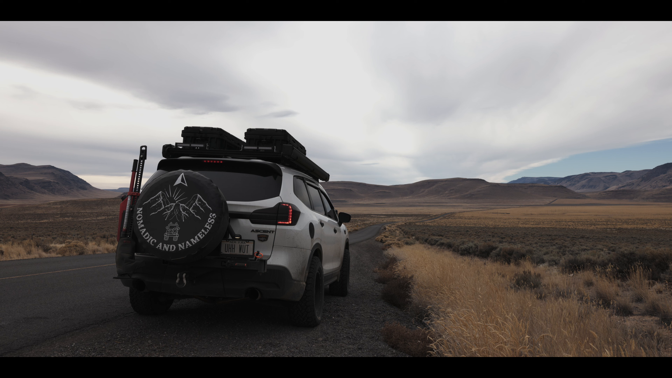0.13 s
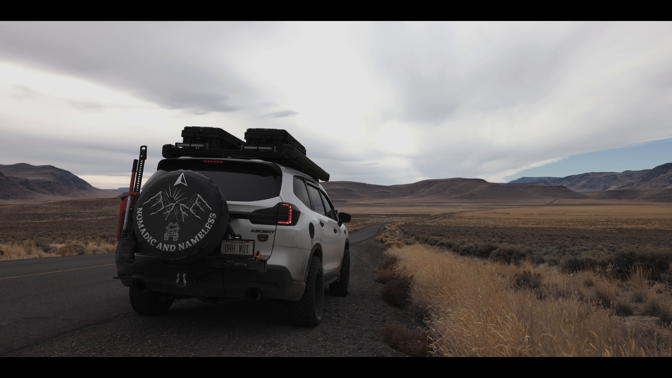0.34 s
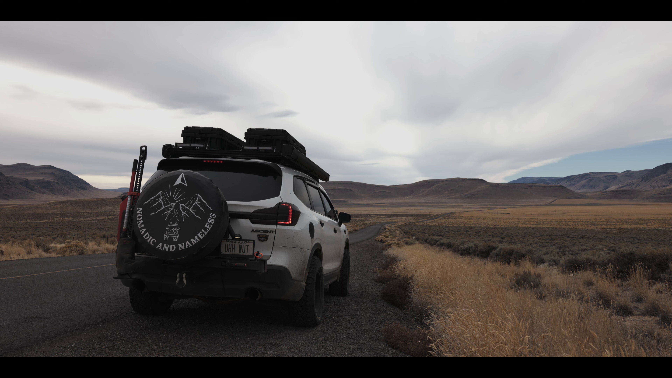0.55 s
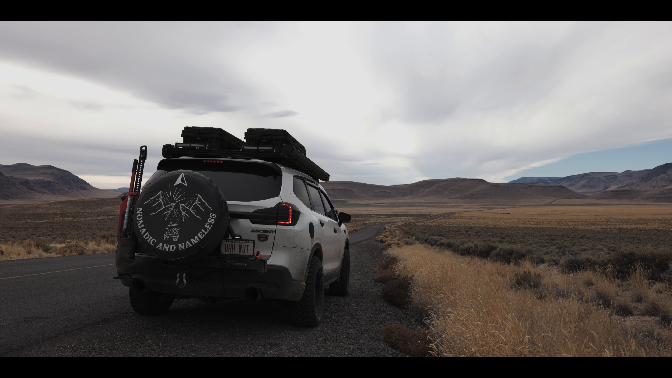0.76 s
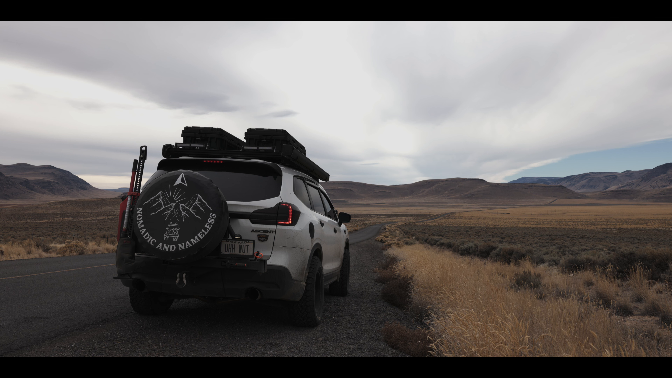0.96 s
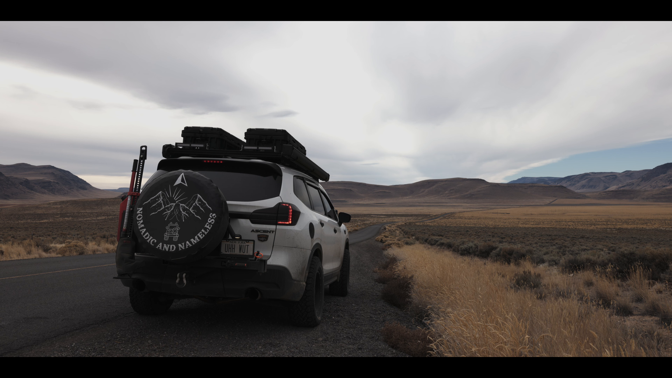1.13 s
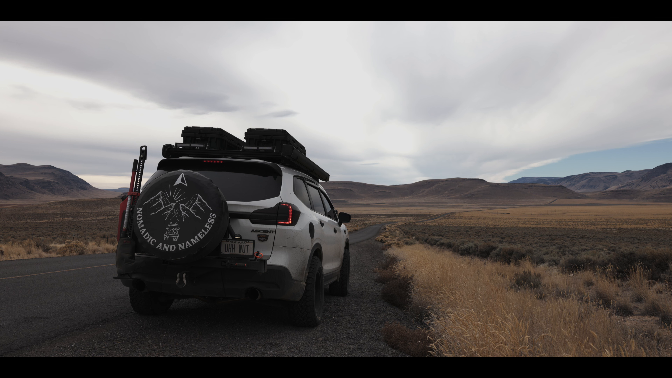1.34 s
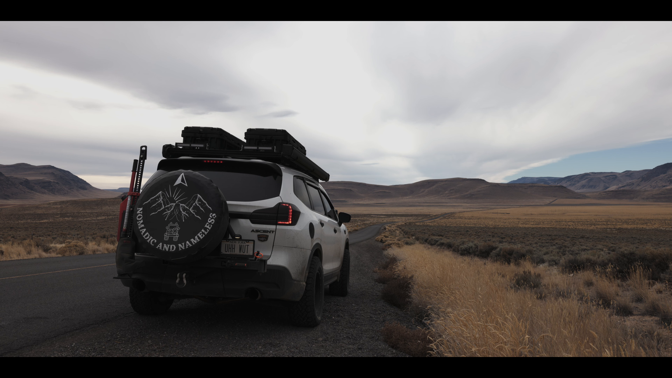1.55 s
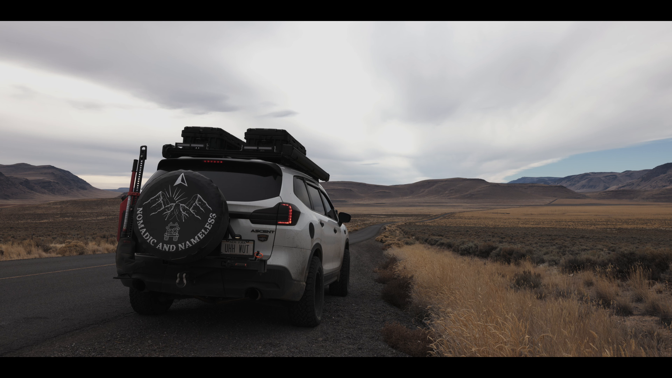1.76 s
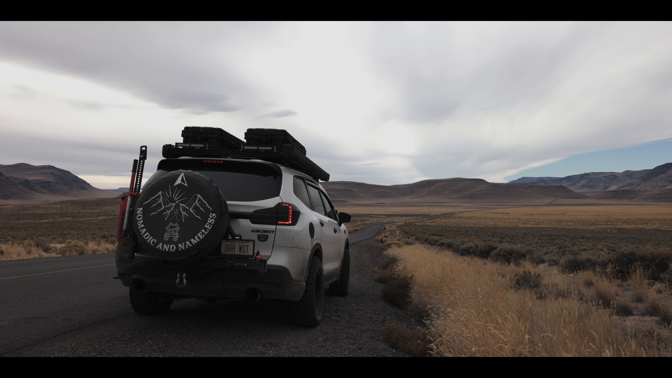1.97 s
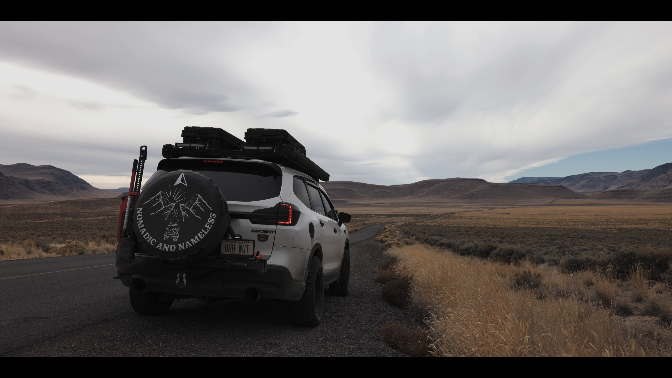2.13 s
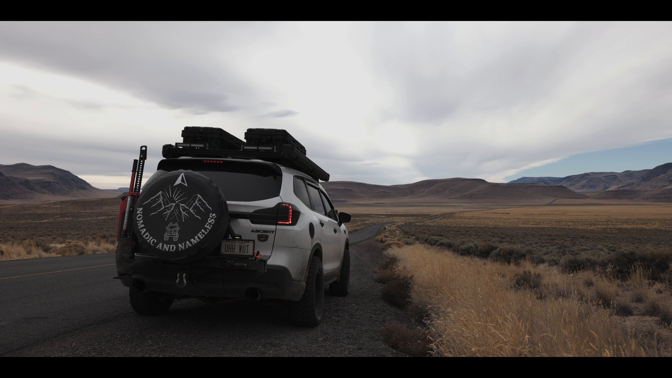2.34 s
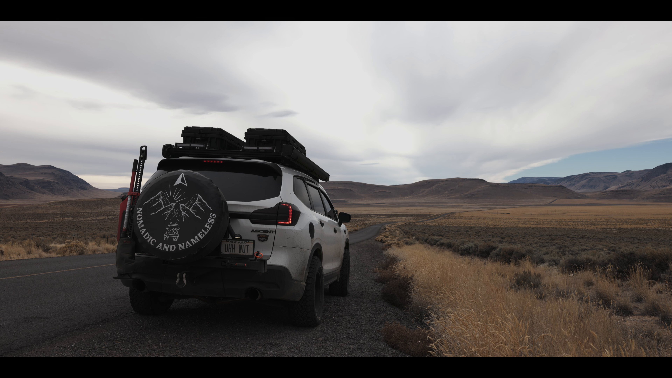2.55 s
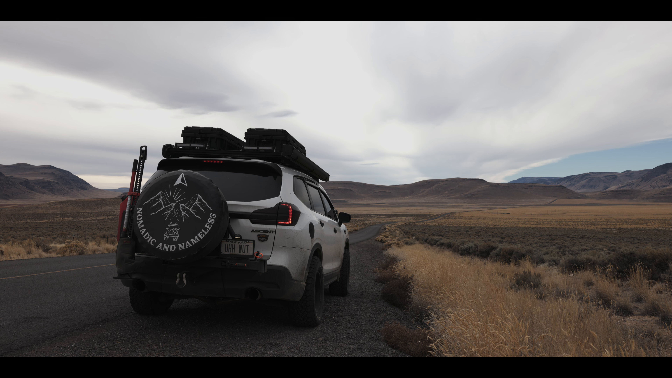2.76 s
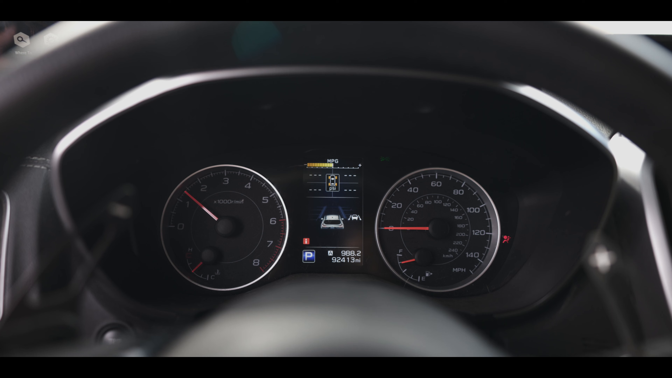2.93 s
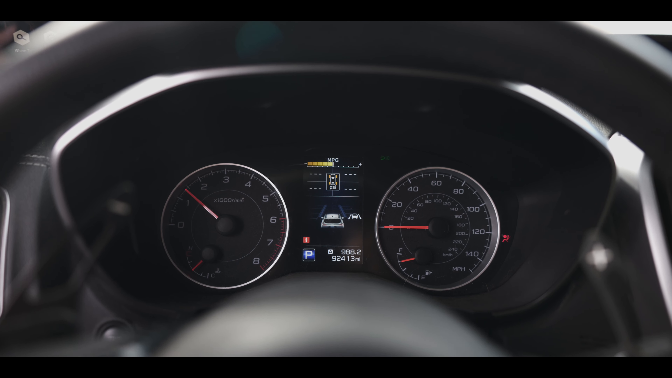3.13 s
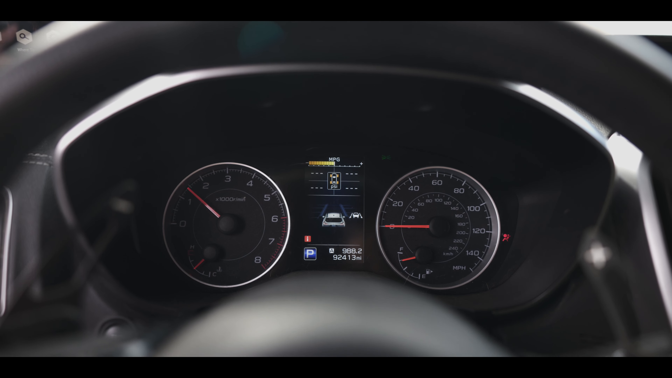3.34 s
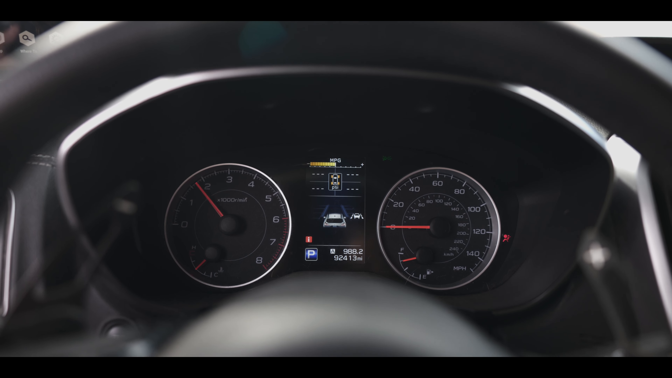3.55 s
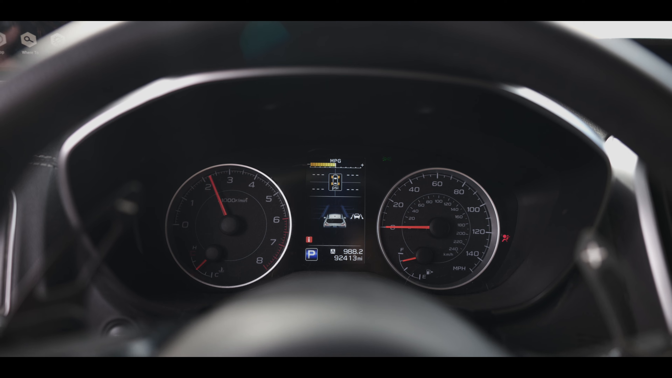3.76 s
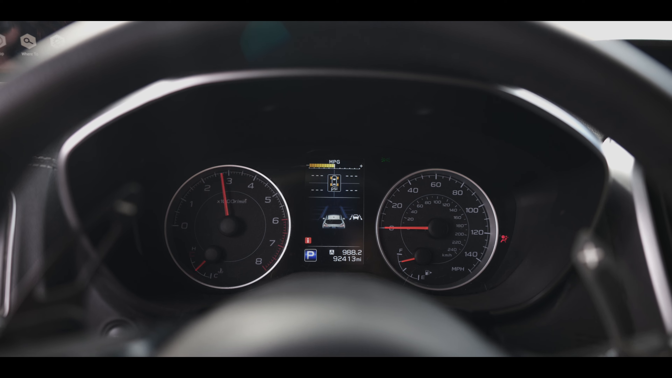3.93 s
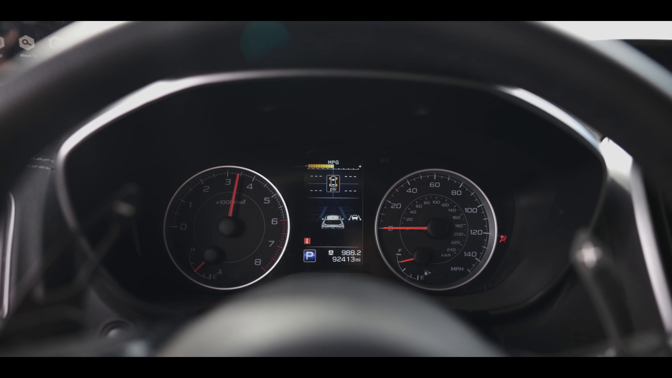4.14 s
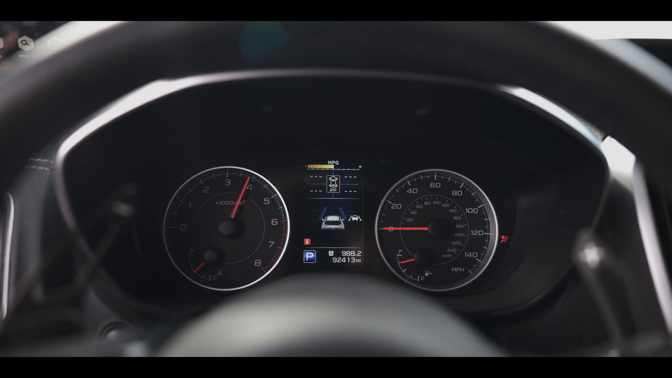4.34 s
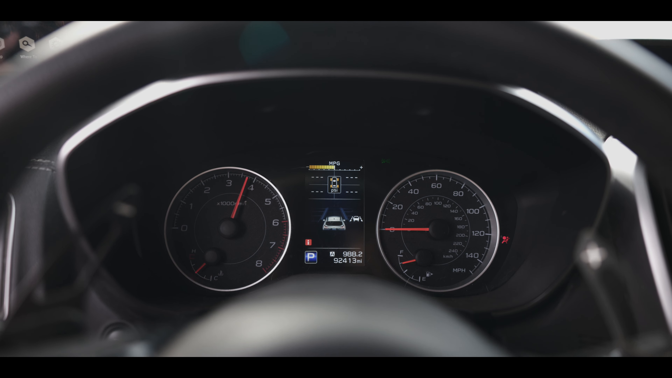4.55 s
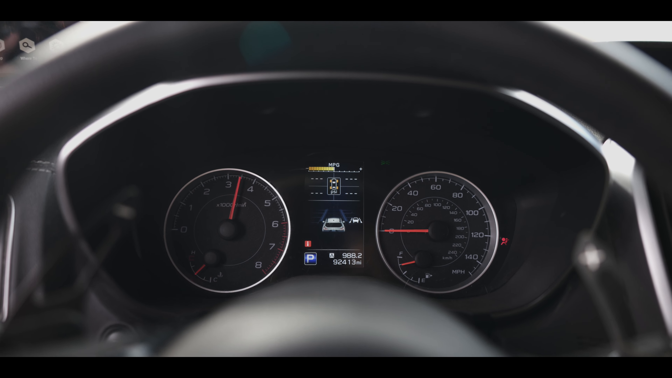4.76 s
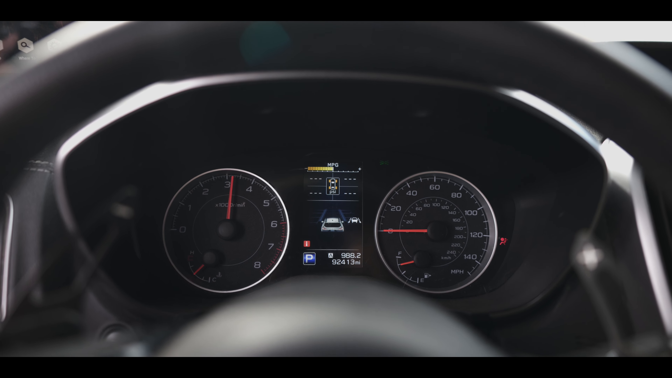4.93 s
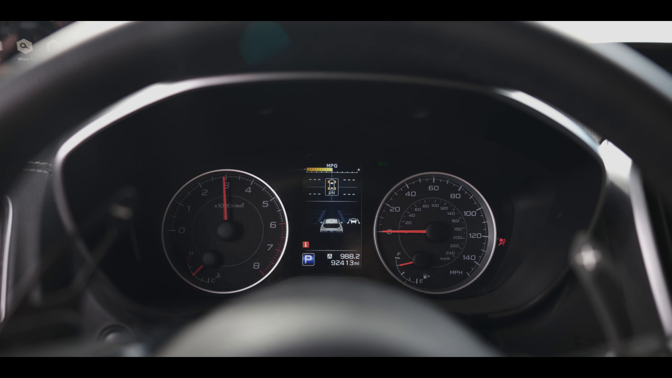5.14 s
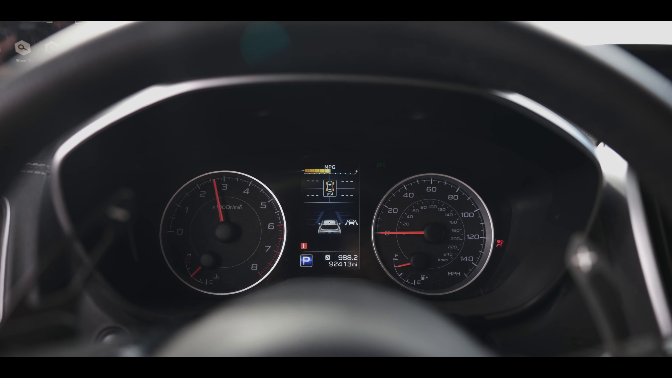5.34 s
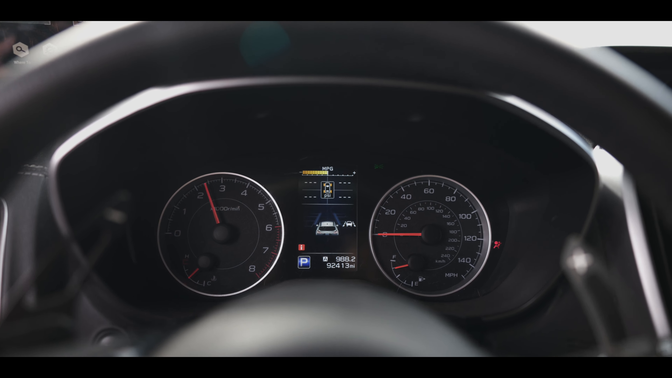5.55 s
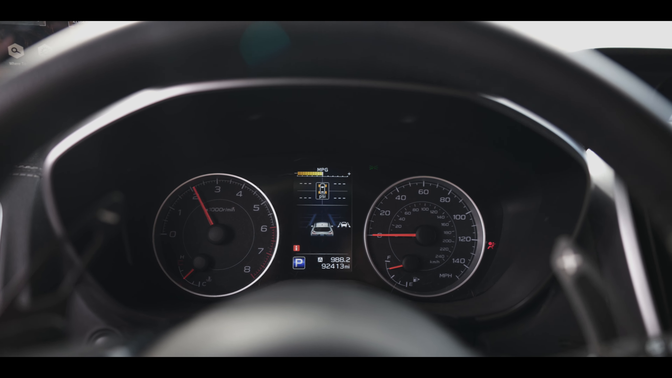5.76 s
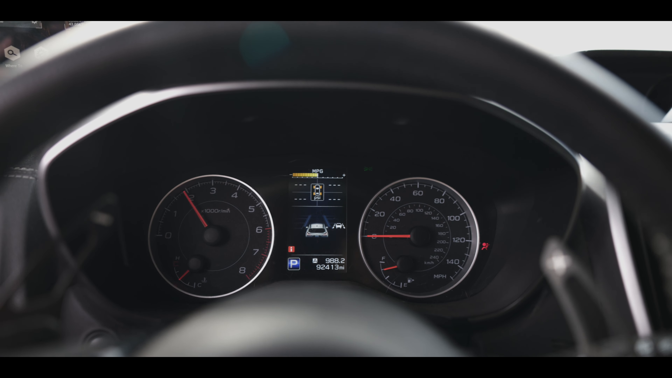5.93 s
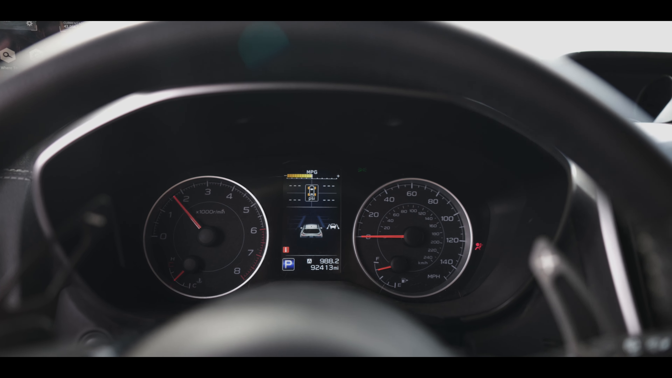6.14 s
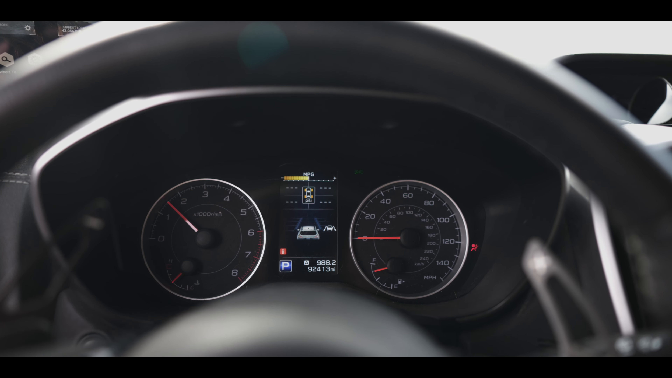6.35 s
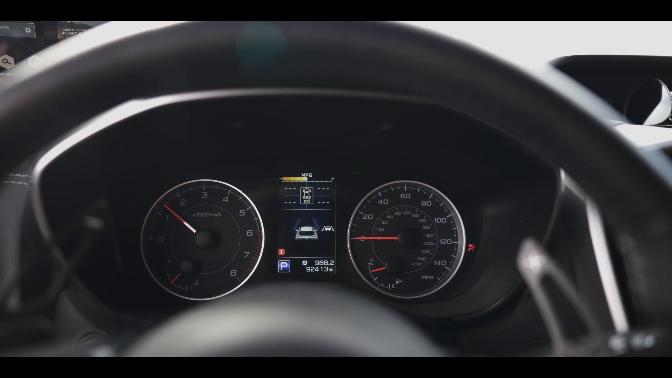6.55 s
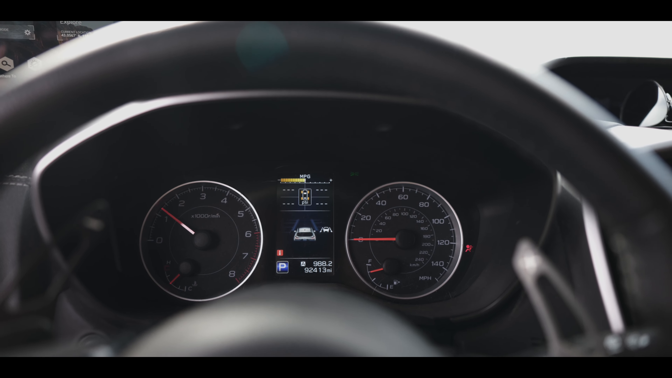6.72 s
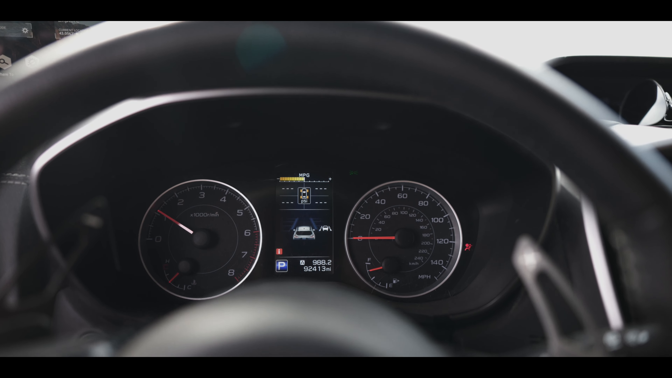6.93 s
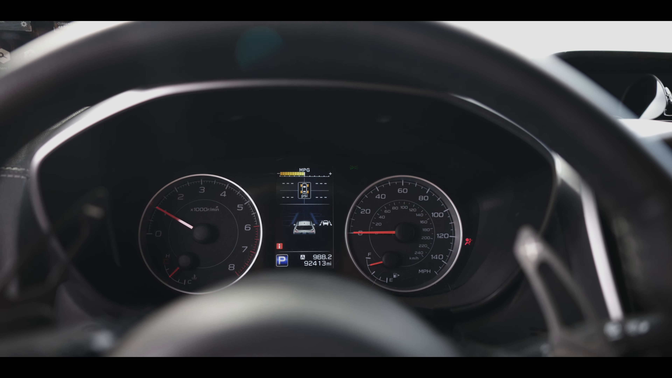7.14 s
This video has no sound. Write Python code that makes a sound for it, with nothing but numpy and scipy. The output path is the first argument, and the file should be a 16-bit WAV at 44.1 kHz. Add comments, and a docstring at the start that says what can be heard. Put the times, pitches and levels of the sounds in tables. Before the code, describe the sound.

A parked car's engine putters at idle with small exhaust pops, then revs once and sinks back with a backfire.

```python
"""Close to the tailpipe of a parked car, a turbocharged four-cylinder putters at idle: each firing
thumps through the pipe and puffs out gas, and now and then one pops. After a jump to another spot
the engine is revved once: its pulses sweep the pipe's resonances, booming, then rasping near the top.
A softer bang marks the peak, and the revs sink with one backfire. A few small clacks and the
stepping of a lens motor sound close by, over still air."""
import sys
import numpy as np
from scipy import signal
from scipy.io import wavfile
from scipy.ndimage import uniform_filter1d, map_coordinates

SR = 44100
rng = np.random.default_rng(int(sys.argv[2]) if len(sys.argv) > 2 else 0)


def transcribe(u):
    """Save the signal u as a 16-bit wav file named by the first command-line argument.

    u: samples, shape (n,) or (channels, n), limited to [-1, 1]; the rate is SR.
    q: integer samples, one column per channel.
    """
    v = np.clip(np.atleast_2d(u).T, -1, 1)
    q = np.round(v * 32767).astype(np.int16)
    wavfile.write(sys.argv[1], SR, q)


N = 321489
T = np.arange(N) / SR
CRUISE_RATE = 100  # firings per second

# the pipe's main resonance (frequency [Hz], level [dB])
PIPE_BOOM = [(40, -27), (90, -14.5), (135, -18.5), (158, -7.5), (172, -1), (186, -6), (205, -21.5),
             (230, -29.5), (300, -41), (600, -64)]
# the dull body of a bang or a knock (frequency [Hz], level [dB])
DULL_BODY = [(200, -4.5), (350, 2), (560, 2.5), (680, -5), (820, -3), (1050, -11.5), (1400, -16.5),
             (2000, -26), (4000, -52)]


def amp(db):
    """Decibels to gain."""
    return 10 ** (np.asarray(db) / 20)


def unit(x):
    """Scales to an rms of one."""
    return x / np.sqrt(np.mean(x ** 2) + 1e-20)


def steady(x, size=3500):
    """Scales to a running rms of one."""
    return x / np.sqrt(abs(uniform_filter1d(uniform_filter1d(x ** 2, size), size // 2)) + 1e-16)


def curves(rows):
    """Each column of a table as a curve in time."""
    s, *columns = np.transpose(rows)
    return [np.interp(T, s, c) for c in columns]


def response(points, hz):
    """Gain of a spectrum at the given frequencies."""
    f, db = np.transpose(points)
    return amp(np.interp(np.log(hz), np.log(f), db))


def colour(x, points, size=8192):
    """Rings x through a causal filter with the given spectrum."""
    hz, db = np.transpose(points)
    f = abs(np.fft.fftfreq(size, 1 / SR)) + 1
    octaves_out = np.maximum(np.log2(f / hz[-1]), 0) + np.maximum(np.log2(hz[0] / f), 0)
    gain = np.maximum(amp(np.interp(np.log(f), np.log(hz), db) - 18 * octaves_out), 1e-5)
    taps = np.fft.ifft(np.exp(signal.hilbert(np.log(gain)).conj())).real[:size // 2]
    return signal.oaconvolve(x, taps)[:len(x)]


def hiss(points):
    """Steady coloured noise."""
    return unit(colour(rng.standard_normal(N), points))


def drift(rate):
    """A smooth random wobble that changes rate times a second."""
    coarse = map_coordinates(rng.standard_normal(4096), [T[::16] * rate], order=3, mode="wrap")
    return unit(np.interp(T, T[::16], coarse))


def add(mix, s, sound):
    """Mixes a sound in at time s."""
    part = mix[max(round(s * SR), 0):][:len(sound)]
    part += sound[:len(part)]


def pulses(turns):
    """One unit click at each whole turn."""
    return np.diff(np.floor(turns), prepend=np.floor(turns[0]))


def swell(lag, rise_s, fall_s):
    """A smooth rise up to lag zero and a dying fall after it."""
    return np.where(lag < 0, np.exp(-(lag / rise_s) ** 2), np.exp(-abs(lag) / fall_s))


def burst(points, decay, size=12000):
    """A coloured puff of noise that dies away."""
    noise = unit(colour(rng.standard_normal(size), points))
    return noise * np.exp(-T[:size] / decay) * np.minimum(T[:size] / 0.0003, 1)


def ring(points, size=12000):
    """The answer of a resonator to one push, with a peak of one."""
    wave = colour(signal.unit_impulse(size), points)
    return wave / abs(wave).max()


def modes(rows, size=12000):
    """Dying sines, struck together."""
    t = T[:size]
    return sum(amp(db) * np.sin(2 * np.pi * hz * t) * np.exp(-t / decay) for hz, db, decay in rows)


def effort(law, rate, load):
    """Gain of a layer that follows engine speed and load."""
    base_db, speed_db, load_db = law
    return amp(base_db + speed_db * np.log2(rate / CRUISE_RATE) + load_db * load)


def idle(puff_db=-49, spit_db=-53, hollow_db=-41, puff_spread_db=1.8, hollow_spread_db=2.6):
    """Each firing thumps through the pipe, rings its hollow resonances and pushes out two puffs of gas."""
    # idle speed (time [s], rate [firings/s])
    idle_speed = [(0, 26.85), (.7, 26.92), (.95, 26.13), (1.2, 27.08), (1.5, 26.56), (1.57, 22.67),
                  (1.8, 21.58), (2.1, 23.2), (2.4, 23.26), (2.95, 22.41)]
    # how hard the engine labours (time [s], share [0-1])
    labouring = [(0, 0.41), (1.48, 0.38), (1.55, 0.15), (2.95, 0.23)]
    # strength of the beats (time [s], level [dB])
    beat_level = [(0, -20.5), (.6, -22.5), (1, -22.5), (1.47, -21.5), (1.56, -25), (1.9, -24.5),
                  (2.2, -22.5), (2.95, -23.5)]
    # a labouring beat, a free-running beat and the escaping gas (frequency [Hz], level [dB])
    deep_beat = [(25, -55.5), (54, -4), (80, 6), (112, 5.5), (138, 1), (165, -3.5), (215, -5.5),
                 (260, -16.5), (325, -24.5), (405, -19.5), (470, -34), (520, -29.5), (620, -52),
                 (1200, -73)]
    free_beat = [(25, -41.5), (46, -3.5), (70, -3.5), (115, -9.5), (139, 10), (175, -14), (215, -15.5),
                 (255, -6), (320, -30.5), (400, -31), (465, -37.5), (525, -25.5), (630, -66), (1200, -67.5)]
    puff_spectrum = [(300, 15), (700, -3), (900, -4.5), (1200, 0), (1650, -3.5), (2000, -7.5), (2500, -12),
                     (4000, -21.5), (7000, -34.5), (14000, -56)]
    # the tailpipe's hollow upper resonances (frequency [Hz], level [dB], decay [s])
    hollow_modes = [(271.6, -3, 0.066), (400.7, 9.5, 0.0082), (515, -3.5, 0.018)]
    # each cylinder's weaker second push of gas
    # (delay [s], share of the thump [0-1], first ring [dB], second ring [dB], second puff [dB])
    second_push = [(0.0105, 0.36, -2, -2.5, 4.5), (0.01074, 0.76, 1.5, 0.5, -6),
                   (0.0085, 0.032, -2, -3, -7.5), (0.0084, 0.043, 0, 4, -5.5)]
    (rate,), (labour,), (level_db,) = curves(idle_speed), curves(labouring), curves(beat_level)
    firings = .37 + np.cumsum(rate) / SR
    beat = (firings + .3).astype(int)
    lag = ((firings + .3) % 1 - .3) / rate  # seconds from this beat's firing
    chance = np.clip(rng.standard_normal((400, 5)), -1.5, 1.5)
    size, puff_size, second_size, spit_pitch, spit_size = chance[beat].T
    delay, share, first_db, second_db, second_puff_db = np.array(second_push)[beat % len(second_push)].T
    churn = unit(rng.standard_normal(N) * (.3 + swell(lag - .007, 0.008, 0.026)))
    # the second push feeds the pipe's ringing or cancels it, so the idle burbles
    onsets = .00296 + .00035 * puff_size, delay + .00035 * spit_size
    first, second = (np.diff(1. * (lag > s), prepend=1) > 0 for s in onsets)
    drive = unit(pulses(firings) * amp(.7 * size) + second * share * (1 + .048 * second_size))
    drive += .2 * churn
    thump = unit(labour * colour(drive, deep_beat) + (1 - labour) * colour(drive, free_beat))
    # a labouring engine rings the pipe mostly with the second push
    strain = labour - labour.mean()
    pushes = first * amp(first_db - 9 * strain + hollow_spread_db * size)
    pushes += second * amp(second_db + hollow_spread_db * second_size)
    hollow = unit(signal.oaconvolve(unit(pushes) + .4 * churn, modes(hollow_modes))[:N])
    # the gas flow builds up over a few milliseconds and never quite stops
    surge = swell(lag - .0041, .0011, .0065)
    surge += amp(second_puff_db) * swell(lag - delay - .003, .0011, .0065)
    flow = .58 + amp(puff_spread_db * puff_size) * surge
    puff = unit(colour(rng.standard_normal(N) * flow, puff_spectrum))
    # the fastest gas whistles hoarsely, at a new pitch each beat, and sags as the puff dies
    sag = 1 - 4 * np.clip(lag - .006, -.01, .01)
    whistle_hz = 1650 * sag * (1 + .045 * spit_pitch + .13 * drift(1300))
    whistle = np.sin(2 * np.pi * np.cumsum(whistle_hz) / SR)
    spit = unit(whistle * amp(puff_spread_db * spit_size) * swell(lag - .0043, .0011, .0071))
    # a free-running engine chuffs a little louder
    chuff = amp(-7 * strain) * (amp(puff_db) * puff + amp(spit_db) * spit)
    return amp(level_db) * thump + unit(amp(level_db)) * (amp(hollow_db) * hollow + chuff)


def rev(gate=0.12, jitter=0.0088, cut_from_s=4.61, cut_to_s=5.77, hard_from=63, hard_full=122):
    """Firing pulses sweep the pipe's resonances; load and speed make them loud, bright and hard."""
    # engine speed (time [s], rate [firings/s])
    rev_speed = [(2.96, 48.2), (3.25, 45.5), (3.48, 58.5), (3.63, 73.5), (3.8, 88.3), (4.255, 139.5),
                 (4.35, 129.8), (4.65, 116), (5.45, 79.8), (5.8, 63.5), (5.96, 59), (6.12, 52.8),
                 (6.5, 44.5), (6.87, 35.2), (7.08, 32), (7.29, 37)]
    # the pedal is pressed once and let go; the idle control catches the revs (time [s], load [0-1])
    throttle = [(2.96, 0.4), (3.21, 0.2), (3.45, 0.79), (4.255, 0.88), (4.272, 0.24), (4.65, 0.02),
                (5.76, 0.21), (5.99, 0.22), (6.22, 0), (6.85, 0.04), (7.29, 0.5)]
    # each cylinder's pulse (strength [ratio])
    cylinders = [1.29, 0.33, 1.22, 1.2]
    # the pipe's upper resonances off and on the throttle, and rushing gas (frequency [Hz], level [dB])
    shut_spectrum = [(150, -32.5), (235, -4), (275, 0.5), (320, 1), (364, 5.5), (400, -1.5), (450, -8),
                     (520, -14.5), (640, -14), (800, -18.5), (1000, -34.5), (1600, -45.5)]
    open_spectrum = [(170, -28.5), (250, 6), (325, 12), (360, -1.5), (410, 0.5), (490, 1), (565, -1.5),
                     (640, -3), (760, -9), (870, 10), (980, -15.5), (1700, -23), (3500, -53.5)]
    rush_spectrum = [(400, -4), (800, 5.5), (1300, 1), (1750, 0), (2200, -9), (3000, -16.5), (4200, -25.5),
                     (6500, -40), (10000, -49.5), (15000, -59)]
    # how each layer follows the engine
    # (level coasting at CRUISE_RATE [dB], change per doubling of speed [dB], change at full load [dB])
    boom_law = (-4.5, -0.84, 11.4)
    rasp_law = (-39.5, 8.25, 13.6)
    rush_law = (-50.5, 10.6, 5.1)
    whine_law = (-50.5, 6, -8)
    valve_law = (-75.5, 30, -2)
    (rate,), load = curves(rev_speed), np.clip(curves(throttle)[0], 0, 1)
    hard = load * np.clip((rate - hard_from) / (hard_full - hard_from), 0, 1)
    firings = np.cumsum(rate) / SR
    even_phase = 2 * np.pi * firings
    firings += jitter * (1 - load) * drift(45)  # less regular with the throttle shut
    beat = firings.astype(int)
    # while the fuel is cut the cylinders pump more evenly
    fuel_cut = uniform_filter1d(1. * ((T > cut_from_s) & (T < cut_to_s)), size=2000)
    lopsided = 1 - .74 * fuel_cut
    imbalance = (np.array(cylinders) / np.mean(cylinders) - 1)[beat % len(cylinders)]
    size = 1 + lopsided * imbalance + .45 * rng.standard_normal(2000)[beat]
    # the lowest harmonics are smooth tones; the pulses carry all the rest
    tones, pulse_lows = low_orders(rate, load, 2 * np.pi * firings, lopsided)
    edges = steady(size * pulses(firings) - pulse_lows)
    flow = unit(1 - gate + 2 * gate * np.exp(-(firings % 1) / 0.63))
    gas = flow * rng.standard_normal(N)
    boom = colour(edges + .48 * gas, PIPE_BOOM)
    shut_rasp = steady(colour(edges + .85 * gas, shut_spectrum))
    open_rasp = steady(colour(edges + .9 * gas, open_spectrum))
    # as the pulses harden, the rasp gives way to the clean growl
    rasp = (1 - hard) * shut_rasp + hard * .4 * open_rasp
    layers = [(boom, boom_law), (rasp, rasp_law), (flow * hiss(rush_spectrum), rush_law),
              (whine(rate, even_phase), whine_law), (valves(firings), valve_law)]
    roar = sum(effort(law, rate, load) * sound for sound, law in layers)
    return tones + hard * growl(rate, even_phase) + roar


def low_orders(rate, load, phase, lopsided, flutter=0.11, heat=0.071):
    """Low harmonics boom in the cabin. Returns them and the part of the pulse train they replace."""
    # smooth engine orders, at two firings per turn (order [cycles/turn],
    # level coasting at CRUISE_RATE [dB], change per doubling of speed [dB], change at full load [dB])
    orders = [(2, -21.5, 1.5, 2), (3, -37.5, 22.5, -4.5), (4, -33.5, 3.5, 17), (6, -31.5, 5.5, 13)]
    # the cabin's resonances (frequency [Hz], gain [dB])
    cabin = [(32, -25), (40, -18.5), (47, -15), (59, -6), (84, -3.5), (102, -2), (120, -1), (138, -5),
             (152, 5), (169, 10.5), (181, 4.5), (193, 1.5), (205, -11), (250, -11), (320, -12), (355, -31),
             (395, -13.5)]
    slow_coast = (1 - load) * np.maximum(1 - rate / CRUISE_RATE, 0)
    tones, pulse_lows = np.zeros(N), rate / SR
    for order, *law in orders:
        k = round(order) / 2
        # hot gas under load raises the resonance
        gain = effort(law, rate, load) * response(cabin, k * rate / (1 + heat * load))
        gain *= 1 + k * flutter * (1 + .91 * slow_coast) * drift(22)
        if k.is_integer():
            pulse_lows += 2 * rate / SR * np.cos(k * phase)
        else:
            gain *= lopsided
        tones += np.sqrt(2) * gain * np.sin(k * phase)
    return tones, pulse_lows


def growl(rate, phase, level_db=-28.3, waver=.16, wander=.17, surge=.21):
    """Hard, unsteady firing pulses sing in the silencer as their harmonics climb through it."""
    # the growl on full throttle (multiple of the firing rate, level [dB])
    harmonics = [(2.5, -1), (3, 0), (4, 0), (4.5, -13), (5, 0), (6, -.5), (6.5, -7), (7, 0), (7.5, -6),
                 (8, -3)]
    # the silencer's resonances (frequency [Hz], gain [dB])
    silencer = [(220, -14), (295, -9), (330, 3), (358, -15), (412, 1.5), (460, -5), (490, -1), (515, -10),
                (550, 0), (592, -2), (625, -13), (660, -6), (710, -8), (740, -16), (800, -10), (838, -4.5),
                (885, -9), (940, -21), (1100, -26)]
    out = np.zeros(N)
    for k, db in harmonics:
        gain = amp(db) * response(silencer, k * rate) * (1 + waver * drift(45))
        out += gain * np.sqrt(2) * np.cos(k * phase + wander * drift(70))
    return amp(level_db) * (1 + surge * drift(130)) * out


def backfires(lag_s=0.0098, echo_s=0.057, crack_rise_s=0.0042):
    """Fuel lights in the exhaust: a crack rings the silencer's shell, then the pipe booms twice."""
    # bangs (time [s], crack [dB], shell ring [dB], boom [dB], thud [dB], second boom [dB])
    bangs = [(4.250, -45, -48, -13.5, -23.5, -22.5), (5.769, -21, -22.5, -8.5, -26.5, -11.5)]
    # the crack and the low thud (frequency [Hz], level [dB])
    crack_spectrum = [(200, -14), (400, -9), (580, 12.5), (690, -10), (830, 15.5), (1050, -5), (1400, 6.5),
                      (1700, 4), (1950, -14.5), (2300, -15), (3000, -20.5), (5000, -44), (9000, -57.5)]
    thud_spectrum = [(20, -7), (55, 13), (100, -0.5), (160, 1), (300, -10.5), (800, -70)]
    # ring of the silencer's shell (frequency [Hz], level [dB], decay [s])
    shell_modes = [(585, -7, .014), (812, 0, .009), (890, -2, .009), (1405, -15, .016), (1930, -19, .011)]
    out, boom = np.zeros(N), ring(PIPE_BOOM)
    for s, crack_db, shell_db, boom_db, thud_db, echo_db in bangs:
        crack = amp(crack_db) * burst(crack_spectrum, decay=.008) + amp(shell_db) * modes(shell_modes)
        add(out, s, crack * np.minimum(T[:len(crack)] / crack_rise_s, 1))
        add(out, s + lag_s, amp(crack_db - 11) * burst(DULL_BODY, decay=.042))
        add(out, s + lag_s, amp(boom_db) * boom + amp(thud_db) * ring(thud_spectrum))
        add(out, s + lag_s + echo_s, amp(echo_db) * boom)
    return out


def pops(gap_s=0.00795, first_db=-2):
    """Now and then an idle firing comes out hard: two quick pushes and a hollow pop."""
    # hard firings (time [s], level [dB])
    hard_firings = [(1.5235, -27), (2.057, -34), (2.2305, -28.5), (2.402, -27.5), (2.575, -27.5),
                    (2.659, -35), (2.926, -29.5)]
    # the pipe's answer to one hard push (frequency [Hz], level [dB])
    pop_spectrum = [(250, -22), (330, -12), (390, 0), (450, -3), (515, 0), (570, -9), (630, -30),
                    (1200, -42)]
    out, push = np.zeros(N), ring(pop_spectrum)
    for s, db in hard_firings:
        add(out, s, amp(db + first_db) * push)
        add(out, s + gap_s, amp(db) * push)
    return out


def whine(rate, phase, pulley_ratio=4.92, flicker_db=2.8, wander=.5):
    """A belt-driven pulley's harmonics slide with the revs and flare in the panels' resonances."""
    # the pulley's tone (harmonic number, level [dB])
    harmonics = [(2, -3), (3, 0), (4, -6), (5, -9), (6, -10), (7, -7), (8, -13)]
    # the panels that radiate it (frequency [Hz], gain [dB])
    panels = [(300, -8), (360, 13), (420, -4), (680, -9), (755, 0), (810, -12), (860, -4), (1020, -15),
              (1085, -5), (1170, -3), (1205, -5), (1240, 3), (1275, 2), (1345, -16), (1420, 0), (1465, 0),
              (1545, -14), (1670, -1), (1790, -1), (1900, -17), (2170, -10), (2450, -17), (2730, -13),
              (3300, -28), (5000, -50)]
    out = np.zeros(N)
    for k, db in harmonics:
        gain = amp(db + flicker_db * np.clip(drift(32), -2.5, 1))
        tone = np.sin(k * pulley_ratio * phase + wander * drift(60))
        out += gain * response(panels, k * pulley_ratio * rate) * tone
    return out


def valves(firings, spread_db=2.5):
    """Two valves snap shut for each firing, no two equally hard."""
    # clatter of the valve gear (frequency [Hz], level [dB])
    clatter = [(1200, -14.5), (2200, -1), (3200, 9), (4200, -7.5), (6000, -10.5), (10000, -26)]
    size = amp(spread_db * rng.standard_normal(4000))[(2 * firings).astype(int)]
    snaps = size * np.exp(-(2 * firings % 1) / .3)
    return unit(colour(snaps * rng.standard_normal(N), clatter))


def clacks():
    """Small hard things knock: a bright click, a scuff, a dull thump and ringing metal and body."""
    # knocks (time [s], click [dB], metal [dB], scuff [dB], thump [dB], body [dB], rise [s], decay [s])
    knocks = [(0.6706, -45.5, -51, -41, -58, -57, .0004, 0.015),
              (0.688, -53.5, -63, -42, -43.5, -43, 0.0033, 0.026),
              (0.721, -52, -69, -37.5, -46, -50, .001, 0.0086),
              (0.728, -60.5, -71, -43.5, -35, -39.5, 0.00088, 0.043),
              (0.795, -71, -80, -42.5, -58, -68, 0.0016, 0.015),
              (0.809, -75, -79, -50.5, -57, -58, .001, 0.03),
              (0.893, -75.5, -82, -54.5, -42, -61, 0.01, 0.055),
              (3.224, -62, -81, -38, -40, -66, 0.00064, 0.0036),
              (5.053, -73, -81, -48, -53, -62, .001, 0.011),
              (6.903, -55, -84, -48, -35.5, -70.5, .0005, 0.0064)]
    # the click and the scuff (frequency [Hz], level [dB])
    click_spectrum = [(1000, -13.5), (2600, -15.5), (4500, -3.5), (5500, -1.5), (7000, -13), (7800, -8.5),
                      (8800, -22), (10800, -18), (12000, -38.5), (15000, -32.5)]
    scuff_spectrum = [(300, 3.5), (800, -1.5), (1100, 4), (1400, 5.5), (1800, 6), (2600, 5), (3600, -5.5),
                      (6000, -32.5), (12000, -44)]
    # ring of a small metal part and of the struck body (frequency [Hz], level [dB], decay [s])
    metal_modes = [(2331, -6, .007), (3391, -5, .005), (5437, 4, .02), (7700, -8, .012), (10800, -18, .006)]
    body_modes = [(775, -10, .025), (1394, 3, .018), (2186, -9, .012), (2826, -9, .012)]
    out = np.zeros(N)
    for s, click_db, metal_db, scuff_db, thump_db, body_db, rise, decay in knocks:
        clack = amp(click_db) * burst(click_spectrum, decay)
        clack += amp(scuff_db) * burst(scuff_spectrum, decay)
        clack += amp(thump_db) * burst(DULL_BODY, decay)
        clack += amp(metal_db) * modes(metal_modes) + amp(body_db) * modes(body_modes)
        add(out, s, np.minimum(T[:len(clack)] / rise, 1) * clack)
    return out


def lens_motor(gain_db=16, steps_per_s=24, lead_s=.009, lead_db=-6, rattle_db=-14):
    """Each step clicks softly as it starts, then ticks dryly as it stops."""
    # runs of the motor (first step [s], steps [count], relative level [dB])
    runs = [(3.029, 1, -60.5), (3.107, 1, -57.5), (3.1905, 8, -57.5), (3.5686, 4, -59.5), (6.574, 1, -62.5),
            (6.652, 4, -56.5), (6.861, 4, -58)]
    # the dry tick of the lens barrel (frequency [Hz], level [dB])
    barrel = [(1200, -27), (1900, 10.5), (2200, 8.5), (2700, -10.5), (3400, -2.5), (4500, -4.5),
              (5400, -2.5), (6100, 4.5), (7000, -12.5), (7900, -4.5), (9500, -19), (14000, -27)]
    out, tick = np.zeros(N), ring(barrel)
    for start, count, db in runs:
        for s in start + np.arange(round(count)) / steps_per_s:
            for onset, tick_db in (s - lead_s * rng.uniform(.8, 1.25), db + lead_db), (s, db):
                add(out, onset, amp(tick_db) * (tick + amp(rattle_db) * burst(barrel, decay=.002)))
    return amp(gain_db) * out


def chirp(at_s=1.652, hz=4800, fall_hz_per_s=22000, width_s=.022, level_db=-66):
    """A faint falling chirp just after the idle drops."""
    lag = np.clip(T - at_s, -.1, .1)
    pitch = (hz - fall_hz_per_s * lag) * (1 + .03 * drift(900))
    return amp(level_db) * np.exp(-(lag / width_s) ** 2) * np.sin(2 * np.pi * np.cumsum(pitch) / SR)


def air(level_db=-60):
    """A steady bed of still air and faint hiss."""
    # the background noise (frequency [Hz], level [dB])
    air_spectrum = [(30, -9.5), (200, -4.5), (600, 1), (1800, -8), (3000, -13.5), (4500, -20),
                    (6300, -22.5), (8000, -28.5), (11000, -31), (15000, -62)]
    return amp(level_db) * hiss(air_spectrum)


def scene(jump_s=2.962, click_db=-34):
    """The idle, a small click at the jump, then the rev, with the small sounds over still air."""
    crossfade = np.clip((T - jump_s) / 0.006, 0, 1)
    engine = (1 - crossfade) * idle() + crossfade * rev()
    add(engine, jump_s, amp(click_db) * ring([(300, -32), (2000, 2), (6000, -11), (13000, -19)]))
    return (engine + pops() + backfires() + clacks() + chirp() + lens_motor() + air())[None]


def record(dry):
    """A steep low-pass trims the highest treble."""
    lowpass = signal.firwin(511, 15800, window=("kaiser", 9), fs=SR)
    return signal.oaconvolve(dry, lowpass[None], "same")


dry = scene()
out = record(dry)
transcribe(out)
```